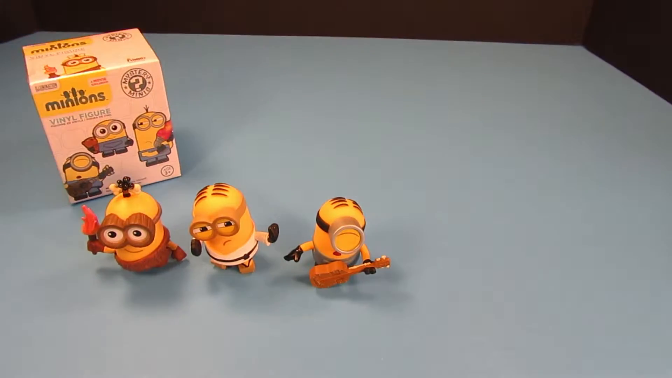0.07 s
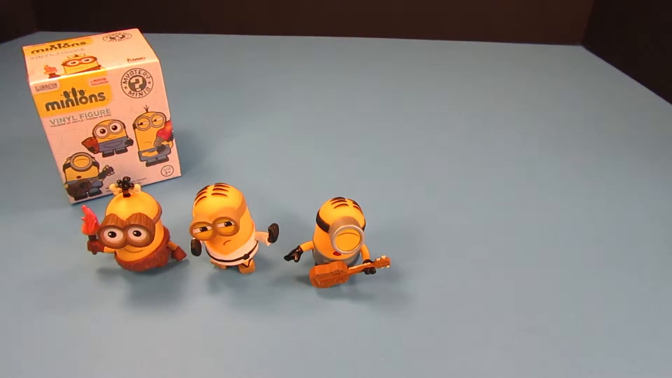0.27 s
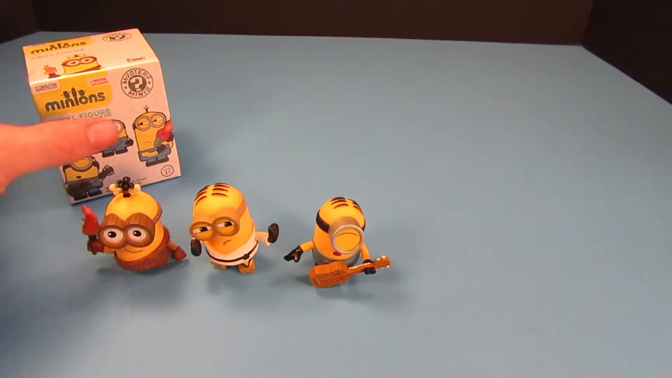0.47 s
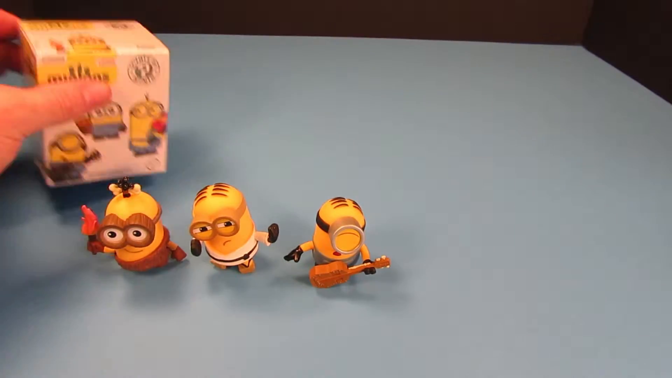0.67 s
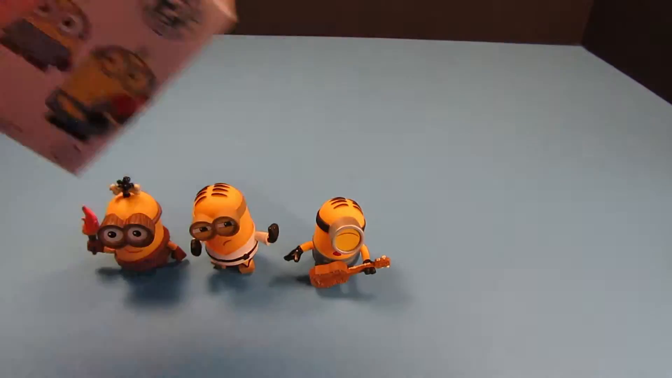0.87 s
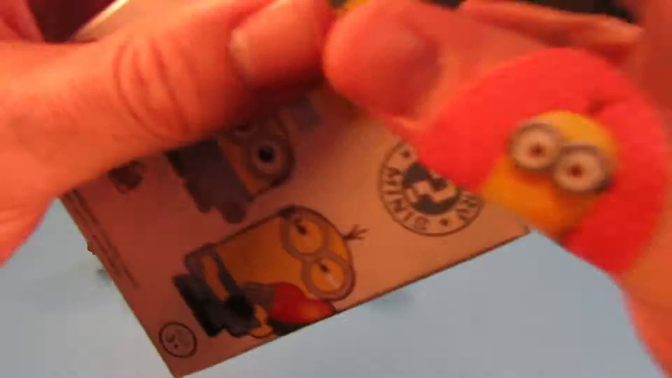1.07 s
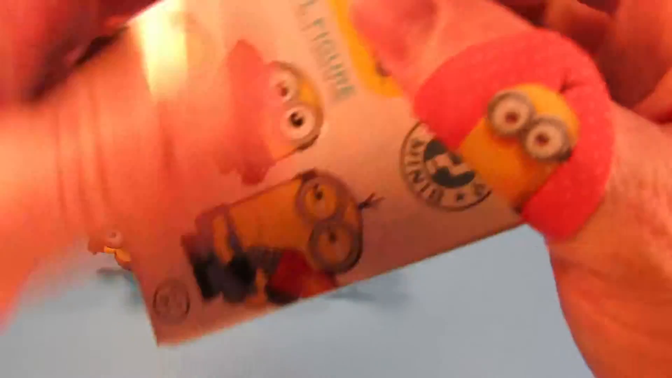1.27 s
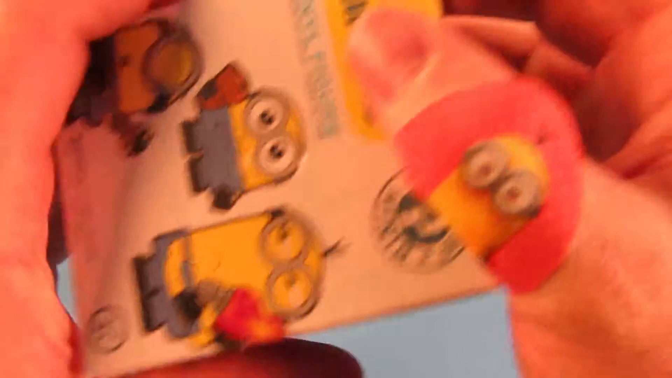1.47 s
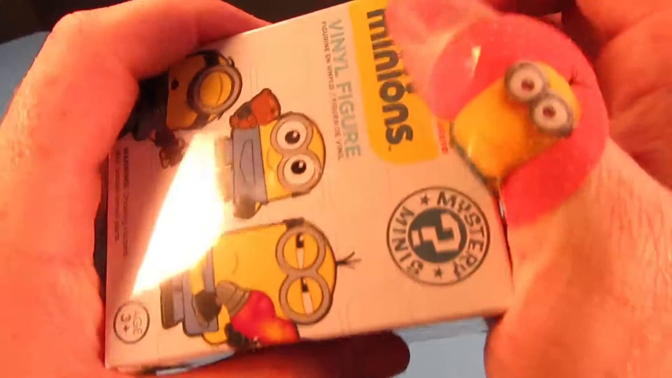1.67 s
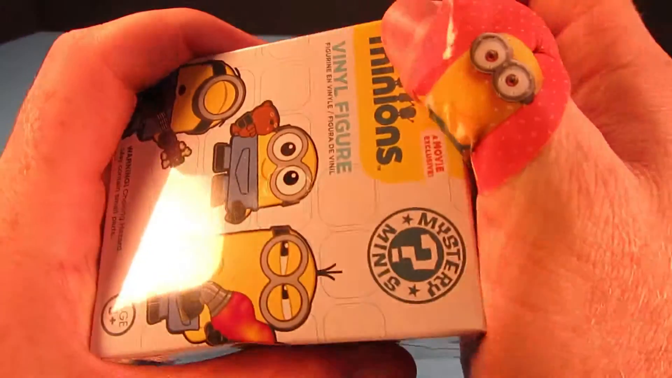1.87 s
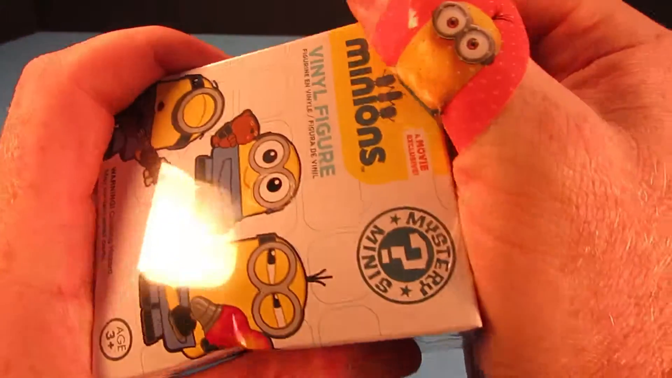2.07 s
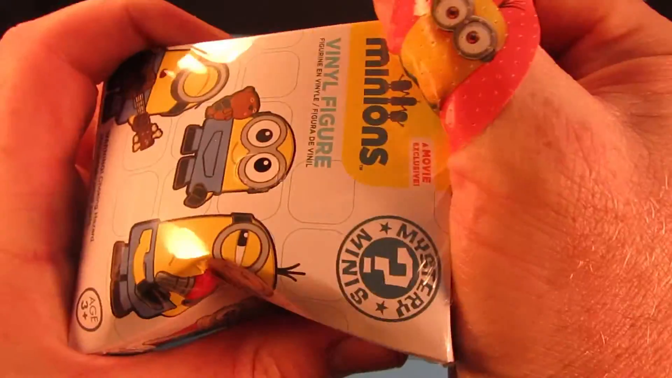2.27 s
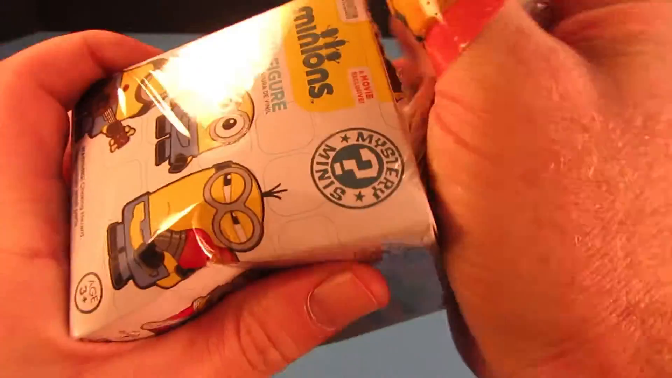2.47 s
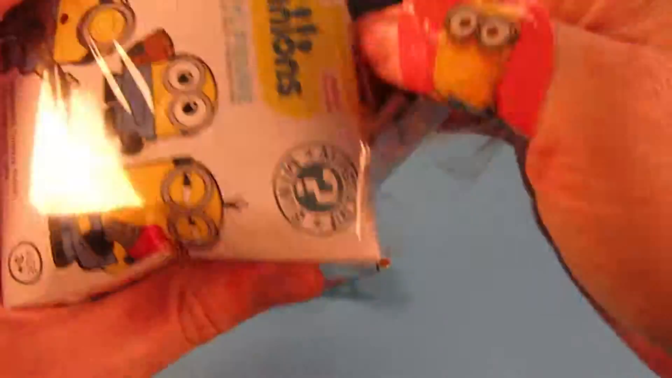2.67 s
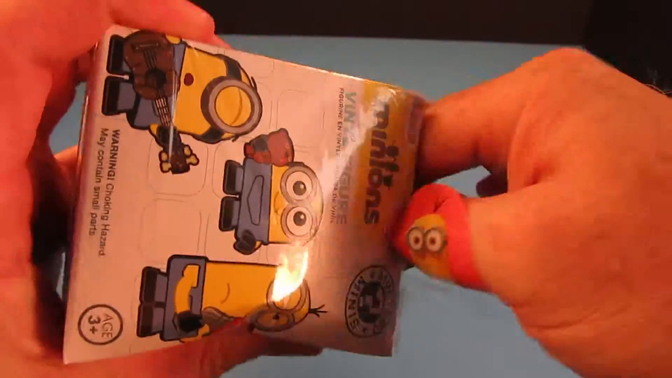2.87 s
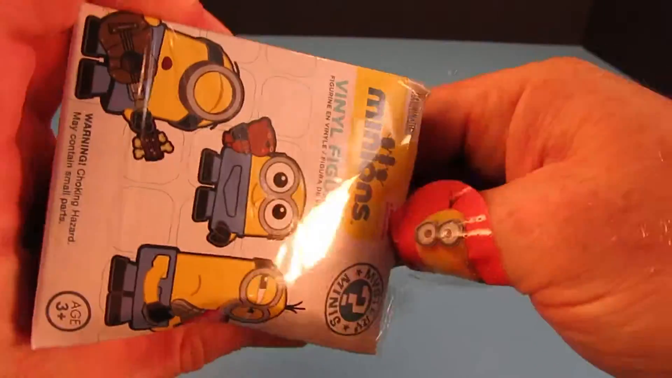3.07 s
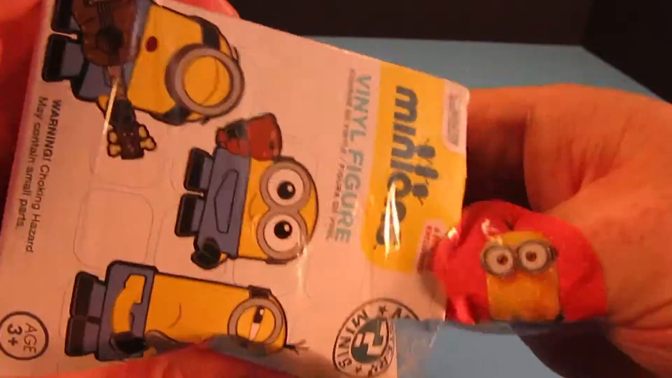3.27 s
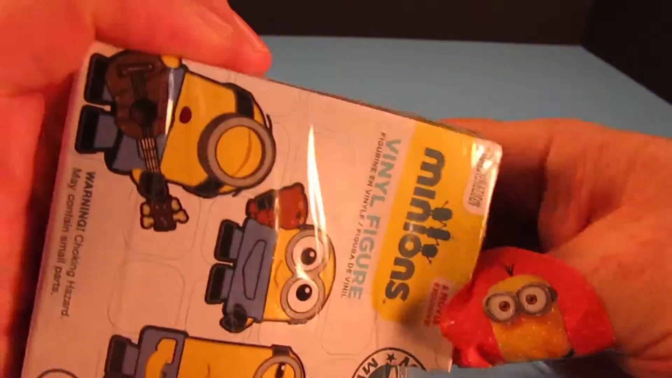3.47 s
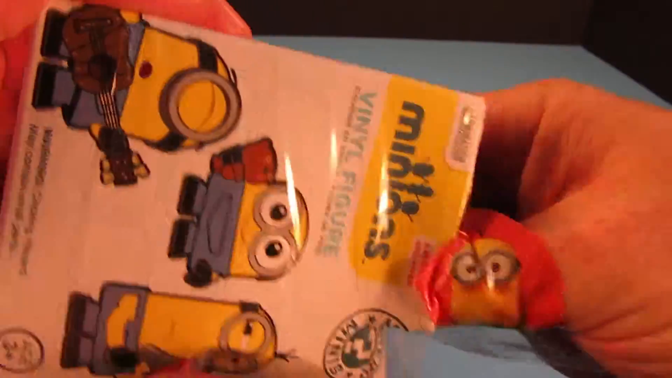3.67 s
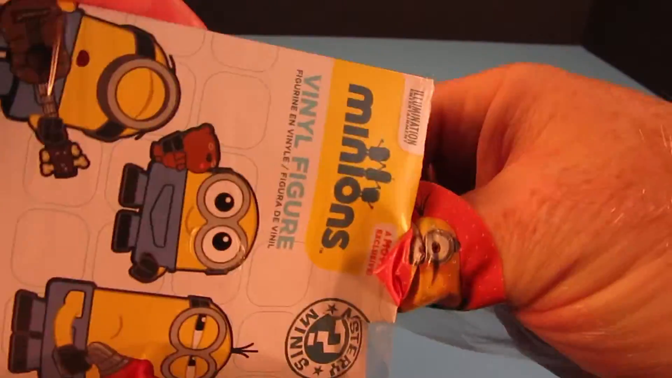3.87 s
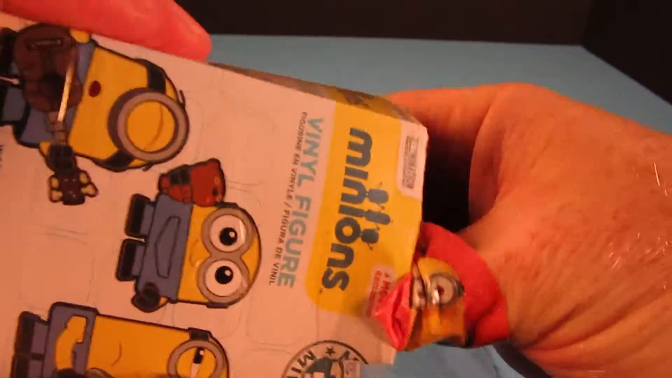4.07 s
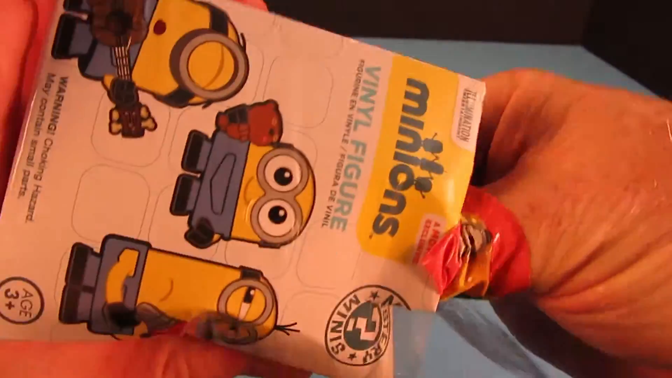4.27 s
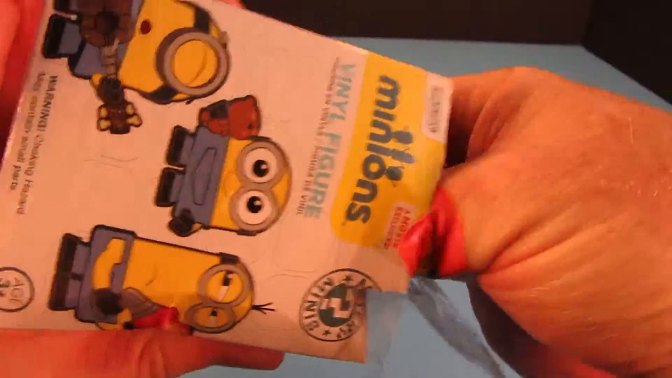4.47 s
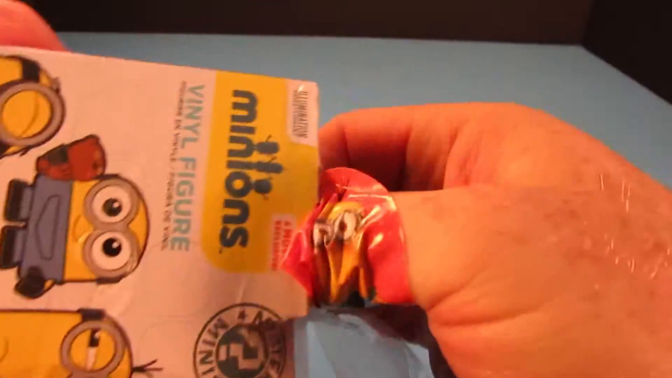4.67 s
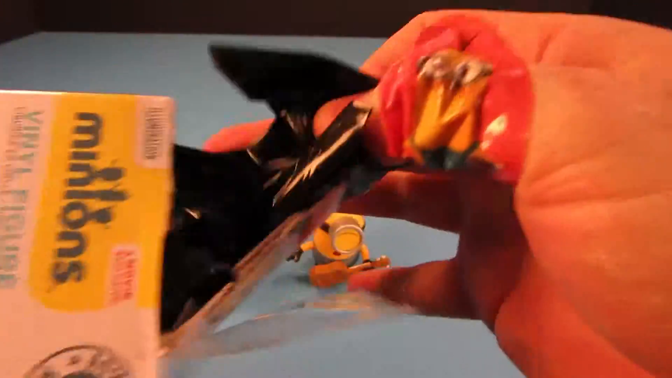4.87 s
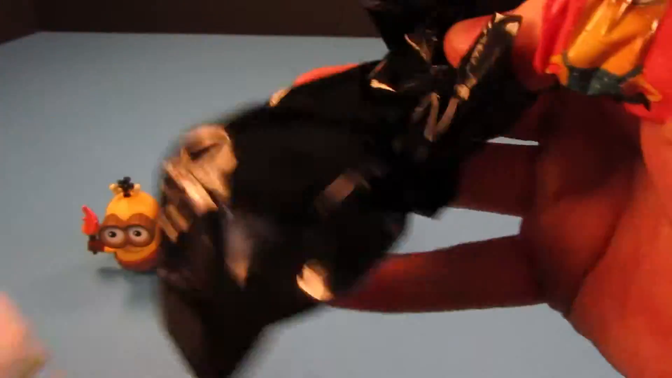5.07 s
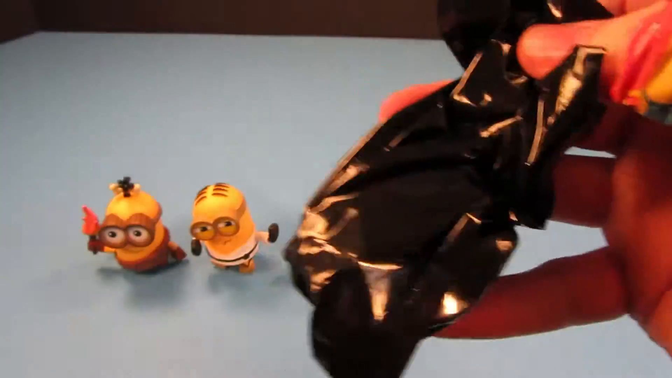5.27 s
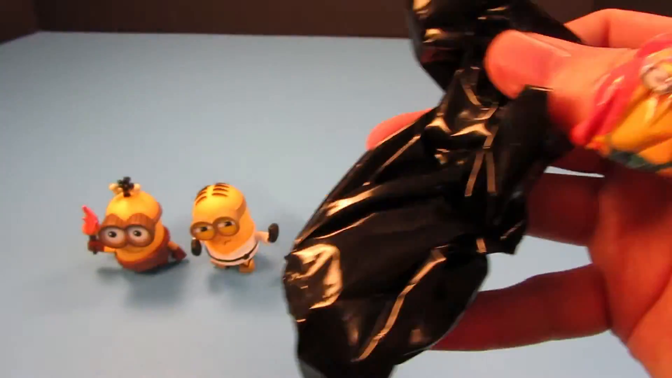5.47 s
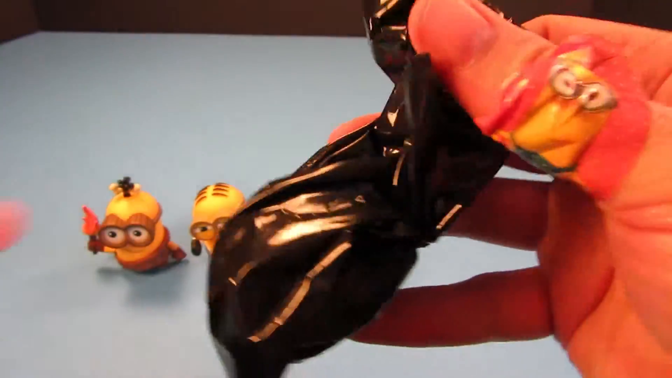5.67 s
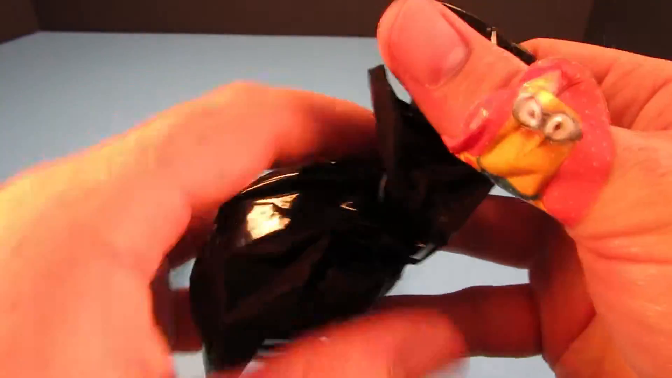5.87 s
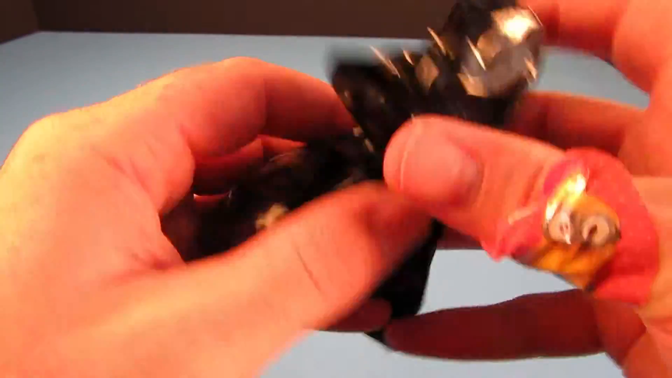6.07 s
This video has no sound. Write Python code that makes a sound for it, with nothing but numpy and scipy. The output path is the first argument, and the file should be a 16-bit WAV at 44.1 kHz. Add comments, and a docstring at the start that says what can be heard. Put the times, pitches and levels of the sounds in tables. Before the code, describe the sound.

A small cardboard box is picked up and worked open by hand, with dry rubbing, hollow finger taps and a flap that clacks loose. Scrapes and crisp snaps continue and thicken into crackling as a foil bag is pulled out. The handling briefly quietens, the empty box lands on the table, and the foil crinkles once more. The microphone is close, in a small, quiet room.

```python
"""A small quiet room, close to a table: hands lift a cardboard box, pry it open and drag out a foil bag.
Card and foil rub in dense stick-slip grains; fingers knock panels and cavity into short hollow rings.
A stiff flap clacks free and judders. Creases buckle with sharp snaps.
The empty box is put down and the bag crackles on in the fingers."""
import sys
import numpy as np
from scipy import signal
from scipy.fft import rfft, irfft
from scipy.io import wavfile
from scipy.ndimage import uniform_filter1d

SR = 44100
rng = np.random.default_rng(int(sys.argv[2]) if len(sys.argv) > 2 else 0)


def log_audio(samples):
    """Write samples as a 16-bit WAV file to the path given in sys.argv[1]."""
    # one column per channel
    frames = np.atleast_2d(samples).T
    # limit to full scale, then quantise
    limited = np.clip(frames, -1, 1)
    pcm = np.round(limited * 32767).astype(np.int16)
    wavfile.write(sys.argv[1], SR, pcm)


N = 269892

# room tone spectrum: f/Hz, level/dB
ROOM_SPECTRUM = [(20, -21), (35, -8.5), (120, -11), (300, -9), (560, -13), (740, -8.5), (1480, -21),
                 (8800, -27.5), (9640, -24.5), (11000, -32.5), (15000, -38.5)]
# room tone envelope: t/s, level/dB
ROOM_ENVELOPE = [(0, -55.5), (1.4, -52), (2.6, -57), (6.12, -60.5)]
# surface hiss spectrum: f/Hz, level/dB
HISS_SPECTRUM = [(300, -37.5), (600, -26), (1200, -4), (2300, -0.5), (4500, -4.5), (7000, -5),
                 (10000, -8.5), (13000, -14), (15000, -16.5)]
# box body spectrum: f/Hz, level/dB
BODY_SPECTRUM = [(50, -29), (120, -13.5), (230, -5), (450, -0.5), (590, -1), (770, 2.5), (940, -9),
                 (1250, -7.5), (2200, -16), (5000, -70.5)]
# light hand contact between strokes: t/s, hiss/dB, body re hiss/dB
HAND_CONTACT = [(0.62, -61.5, 8), (0.95, -55.5, 6), (1.25, -50, 2.5), (1.39, -74, 11), (1.6, -51, 2),
                (1.8, -53.5, 4), (2.35, -48, -3.5), (2.77, -58.5, 1.5), (3.0, -50.5, -1), (3.4, -48.5, -1),
                (3.95, -52.5, -2), (4.4, -49.5, -7), (4.95, -45.5, -7), (5.15, -52, 0), (5.28, -62.5, -1),
                (5.72, -64.5, -6), (5.92, -51, 1.5), (6.12, -47, -1.5)]
# strokes of fingers, card and foil: start/s, length/s, hiss/dB
RUB_STROKES = [(0.911, 0.038, -48), (0.991, 0.086, -44.5), (1.26, .055, -47), (1.467, 0.032, -42.5),
               (1.556, 0.064, -46.5), (1.638, 0.054, -32), (1.883, 0.062, -35), (1.983, 0.074, -38),
               (2.213, 0.049, -32), (2.571, 0.022, -41), (2.663, 0.036, -35), (2.811, 0.039, -46.5),
               (2.888, 0.064, -36.5), (2.975, 0.053, -37.5), (3.095, 0.033, -41), (3.215, .065, -40),
               (3.283, 0.056, -28.5), (3.424, 0.078, -43), (3.672, 0.015, -42.5), (3.765, 0.094, -44),
               (3.948, 0.028, -41), (4.043, 0.081, -42), (4.147, 0.035, -40.5), (4.217, .12, -40.5),
               (4.42, 0.064, -35), (4.554, 0.15, -39), (4.738, 0.03, -39.5), (4.799, 0.28, -31.5)]
# quick slides of card: peak/s, rise/s, fall/s, hiss/dB, body/dB
CARD_SLIDES = [(1.05, 0.0065, .015, -45, -31), (1.678, .005, 0.013, -39, -36),
               (2.252, .002, 0.0059, -13, -43), (2.4, 0.0065, .005, -13.5, -23),
               (2.41, .002, 0.0036, -7, -29.5), (2.427, .0057, 0.017, -15.5, -18),
               (3.312, .008, .005, -15.5, -27), (3.327, .002, 0.007, -14, -15)]
# empty box landing, edge then face: t/s, hiss/dB, body/dB
BOX_LANDINGS = [(5.744, -35, -25.5), (5.759, -25.5, -18.5)]
# table modes: f/Hz, level/dB, 60 dB decay/cycles
TABLE_MODES = [(111, -0.5, 18), (168, -0.5, 17), (290, -6.5, 33), (344, -7, 32.5), (617, 2.5, 38.5),
               (720, 1, 23), (1430, -38, 36)]
# dull bumps on the table: t/s, level/dB
TABLE_BUMPS = [(0.7062, -24), (0.7926, -41), (0.917, -36)]
# card panel modes: frequency ratio, level/dB, 60 dB decay/cycles
PANEL_MODES = [(1, -3.5, 20), (1.17, 2.5, 6), (1.55, -11.5, 15), (2.3, -15, 15.5)]
# air and wall modes of the whole box: frequency ratio, level/dB, 60 dB decay/cycles
CAVITY_MODES = [(1, 4.5, 7.5), (.7, -9.5, 7), (1.35, -16, 15.5)]
# fingers, flaps and contents hitting the box: t/s, panel/dB, cavity/dB, cavity f/Hz
BOX_KNOCKS = [(0.801, -31, -39, 210), (1.032, -11, -12.5, 473), (1.1826, -25.5, -53, 447),
              (1.2285, -26, -46, 370), (1.4994, -25.5, -33, 476), (1.6689, -27, -16.5, 223),
              (1.682, -26.5, -24, 263), (1.9172, -25.5, -23.5, 330), (2.071, -12.5, -25, 453),
              (2.2111, -23.5, -25, 450), (2.2503, -18, -24.5, 350), (2.4122, -21, -15.5, 360),
              (2.4226, -19, -24, 198), (2.9884, -27, -25.5, 480), (3.2883, -10.5, -24, 500),
              (3.3244, -15, -28, 493), (3.3662, -19, -20, 404), (3.5185, -6, -9.5, 371),
              (3.579, -35, -27, 406), (3.7561, -26.5, -39.5, 420), (3.8232, -39, -26, 353),
              (3.953, -27.5, -22.5, 435), (4.1643, -24.5, -23.5, 290), (4.2741, -14, -14.5, 324),
              (4.2935, -26, -29.5, 400), (4.815, -17.5, -11.5, 354), (4.856, -24.5, -27, 251),
              (5.0489, -13, -40, 440), (5.082, -25.5, -45, 437), (5.7558, -14.5, -25, 390)]
# filter on all creases: f/Hz, gain/dB
CREASE_SPECTRUM = [(80, -32.5), (300, 4), (750, 10), (1300, 2.5), (2900, -1), (7000, -2.5), (11000, -2),
                   (15000, -10.5)]
# fingers crumpling the foil: start/s, length/s, typical crease/dB
FOIL_SQUEEZES = [(4.427, .3, -32.5), (4.822, .26, -23), (5.1, .12, -29), (5.28, .35, -51.5),
                 (5.921, .045, -24), (6.001, .11, -31)]
# single creases of foil and card: t/s, level/dB, centre f/Hz
CREASE_SNAPS = [(0.708, -27, 1890), (0.967, -32, 2400), (1.0307, -12, 3600), (1.078, -25, 2600),
                (1.2169, -28.5, 1550), (1.2948, -9.5, 7800), (1.677, -19, 1900), (1.9175, -18, 2620),
                (1.935, -20, 5950), (2.072, -12.5, 3000), (2.2104, -15, 2220), (2.251, -5, 5630),
                (2.3012, -25.5, 1390), (2.3994, -6, 7900), (2.4116, -5.5, 5470), (2.6196, -28.5, 1810),
                (2.9068, -17.5, 2970), (3.0451, -16, 5500), (3.3243, -7.5, 4200), (3.432, -22.5, 2460),
                (3.4442, -18.5, 3020), (3.5194, -16.5, 1700), (3.5668, -25, 3430), (3.7569, -20.5, 2320),
                (3.9537, -20, 2620), (4.0627, -13, 3730), (4.1629, -21.5, 3470), (4.428, -22.5, 2400),
                (4.442, -21, 2750), (4.8156, -6.5, 3700), (4.9892, -18.5, 4140), (5.0491, -9, 3480),
                (5.2955, -33.5, 3900), (5.3103, -20, 3780), (5.3876, -28, 4740), (5.5299, -35, 3060),
                (5.856, -27, 5000), (5.9091, -24, 2900), (5.9493, -19, 5100), (6.0585, -24.5, 3020),
                (6.0873, -14.5, 6330), (6.1103, -13.5, 5000)]

JUDDER_TIMES_S = 2.0868 + .0134 * np.arange(4)  # catches of the freed flap


def undb(db):
    """Decibels to gain."""
    return 10 ** (np.asarray(db) / 20)


def unit(x):
    """Scale to unit rms."""
    return x / np.sqrt(np.mean(x ** 2))


def unit_peak(x, size):
    """Scale the loudest window of size samples to unit rms."""
    return x / np.sqrt(uniform_filter1d(x ** 2, size, mode="constant").max())


def curve(rows):
    """Interpolate each column linearly over time."""
    times_s, *columns = np.transpose(rows)
    return [np.interp(np.arange(N) / SR, times_s, column) for column in columns]


def swell(t, rise_s, hold_s, fall_s):
    """Exponential rise to one at t = 0, hold, exponential fall."""
    return np.exp(-np.clip(np.maximum(-t / rise_s, (t - hold_s) / fall_s), 0, 20))


def wander(size):
    """Random drift, correlated over size samples."""
    return np.clip(unit(uniform_filter1d(rng.standard_normal(N), size)), -2, 2)


def add(track, at_s, sound):
    """Mix sound into track."""
    i = max(int(at_s * SR), 0)
    track[i:i + len(sound)] += sound[:max(N - i, 0)]


def colour(x, spectrum, size=2048):
    """Minimum-phase filter from rows of f/Hz, gain/dB."""
    hz, db = np.transpose(spectrum)
    bins_hz = np.maximum(np.fft.rfftfreq(size, 1 / SR), 1)
    gain = undb(np.interp(np.log(bins_hz), np.log(hz), db))
    cepstrum = irfft(np.log(gain))
    cepstrum[1:size // 2] *= 2
    cepstrum[size // 2 + 1:] = 0
    return signal.fftconvolve(x, irfft(np.exp(rfft(cepstrum))))[:len(x)]


def resonance(x, hz, q):
    """Two-pole band-pass, unity gain at centre."""
    w = 2 * np.pi * min(hz, SR / 3) / SR
    a = np.sin(w) / (2 * q)
    return signal.lfilter([a, 0, -a], [1 + a, -2 * np.cos(w), 1 - a], x)


def ring(modes, pitch_hz=1, detune=.067, contact_s=.00031, size=4096):
    """Struck modes, detuned by the grip; soft contact rounds the attack."""
    t = np.arange(size) / SR
    ratio, db, cycles = np.transpose(modes)[:, :, None]
    hz = ratio * pitch_hz * (1 + detune * rng.standard_normal(ratio.shape))
    partials = undb(db) * np.cos(2 * np.pi * hz * t) * np.exp(-np.log(1000) * t * hz / cycles)
    return unit_peak(partials.sum(0) * (1 - np.exp(-t / contact_s)), size=110)


def room_tone():
    """Faint low noise, level drifting slowly."""
    return undb(curve(ROOM_ENVELOPE)[0]) * unit(colour(rng.standard_normal(N), ROOM_SPECTRUM))


def reflections(x, wet_db=-17, t60_s=.12, first_s=.00529, cutoff_hz=4000, size=16384):
    """Table and near walls add a short, duller tail."""
    t = np.arange(size) / SR
    tail = rng.standard_normal(size) * np.exp(-np.log(1000) * t / t60_s) * (t > first_s)
    tail = signal.sosfilt(signal.butter(1, cutoff_hz, fs=SR, output="sos"), tail / np.linalg.norm(tail))
    return x + undb(wet_db) * signal.fftconvolve(x, tail)[:N]


def rubbing_db(attack_s=.005, release_s=.0096, swell_db=1.5, hop=32):
    """Hiss level: light contact plus strokes that press harder toward their end."""
    t = np.arange(N) / SR
    coarse_s = t[::hop]
    power = undb(curve(HAND_CONTACT)[0][::hop]) ** 2
    for start_s, length_s, db in RUB_STROKES:
        age_s = coarse_s - start_s
        pressure_db = swell_db * (np.clip(age_s / length_s, 0, 1) - .5)
        power += (undb(db + pressure_db) * swell(age_s, attack_s, length_s, release_s)) ** 2
    return np.interp(t, coarse_s, 10 * np.log10(power))


def stick_slip(slips_per_s=2600, scatter_db=4, catch_db=3.5, noise_gain=.47):
    """Tiny slips over smooth noise, bunched by catching and letting go."""
    sizes = undb(scatter_db * np.clip(rng.standard_normal(N), -2, 2)) * np.sign(rng.standard_normal(N))
    impulses = unit(sizes * (rng.random(N) < slips_per_s / SR))
    return (impulses + noise_gain * rng.standard_normal(N)) * undb(catch_db * wander(size=180))


def flex(x, depth_db=4.5, q=6):
    """Sheet resonances come and go as it bends."""
    return sum(resonance(x, hz, q) / hz ** .25 * undb(depth_db * wander(size=900))
               for hz in np.geomspace(900, 14000, 14))


def rim_drag(slips, hiss_db, start_s=4.05, length_s=1.07, fade_s=.048, re_hiss_db=-6.5, hz=689, q=4.7):
    """The bag drags over the open rim; a panel sings."""
    gate = swell(np.arange(N) / SR - start_s, fade_s, length_s, fade_s)
    return undb(hiss_db + re_hiss_db) * gate * unit(resonance(resonance(slips, hz, q), hz, q))


def friction(hiss_db, landing_rise_s=.0009, landing_fall_s=.026):
    """Slips drive surface hiss, box body and rim; slides and landings add bursts."""
    t = np.arange(N) / SR
    hiss_gain = undb(hiss_db)
    body_gain = undb(hiss_db + curve(HAND_CONTACT)[1])
    landings = [(at_s, landing_rise_s, landing_fall_s, *levels_db) for at_s, *levels_db in BOX_LANDINGS]
    for at_s, rise_s, fall_s, surface_db, body_db in CARD_SLIDES + landings:
        burst = swell(t - at_s, rise_s, 0, fall_s)
        hiss_gain = np.hypot(hiss_gain, undb(surface_db) * burst)
        body_gain = np.hypot(body_gain, undb(body_db) * burst)
    slips = stick_slip()
    hiss = hiss_gain * unit(colour(flex(slips), HISS_SPECTRUM))
    body = body_gain * unit(colour(slips, BODY_SPECTRUM))
    return hiss + body + rim_drag(slips, hiss_db)


def table_bumps():
    """Bumps ring the table modes."""
    out = np.zeros(N)
    for at_s, db in TABLE_BUMPS:
        add(out, at_s, undb(db) * ring(TABLE_MODES, size=12000))
    return out


def box_knocks(ref_hz=747, ref_db=-21, octaves_per_db=.009, rattle_db=-19, settle_s=.009, size=4096):
    """Knocks and flap catches ring panel and cavity and rattle the loose flaps."""
    out = np.zeros(N)
    settle = np.exp(-np.arange(size) / SR / settle_s)
    catches = [(at_s, -21, -28, 464) for at_s in JUDDER_TIMES_S]  # columns as BOX_KNOCKS
    for at_s, panel_db, cavity_db, cavity_hz in BOX_KNOCKS + catches:
        panel_hz = ref_hz * 2 ** (octaves_per_db * (panel_db - ref_db))  # harder knock, tighter panel
        rattle = undb(rattle_db) * unit(colour(rng.standard_normal(size), BODY_SPECTRUM)) * settle
        add(out, at_s, undb(panel_db) * (ring(PANEL_MODES, panel_hz, contact_s=.0007) + rattle))
        # enclosed air: slower, opposite in sign
        add(out, at_s, -undb(cavity_db) * ring(CAVITY_MODES, cavity_hz, contact_s=.003))
    return out


def flap(clack_s=2.0716, clack_db=-6.5, catch_db=-24.5, hz=2880):
    """The thumb breaks the stiff flap free; each catch rings it again."""
    out = np.zeros(N)
    catches = [(at_s, catch_db) for at_s in JUDDER_TIMES_S]
    for at_s, db in [(clack_s, clack_db)] + catches:
        add(out, at_s, undb(db) * ring(PANEL_MODES, hz, detune=.037, contact_s=.00048))
    return out


def crease(hz, flip_cycles=2.63, click=2.7, flutter_s=.0066, flutter_db=-18,
           broadband_db=-15, facet_db=-2, spread_octaves=.47, size=1024):
    """A crease flips, rings its facet and two neighbours, and leaves the sheet fluttering."""
    t = np.arange(size) / SR
    envelope = np.exp(-t * hz / flip_cycles) + undb(flutter_db) * np.exp(-t / flutter_s)
    force = rng.standard_normal(size) * envelope
    force[0] += click
    octaves = np.append(0, spread_octaves * rng.standard_normal(2))
    facets = sum(resonance(force, hz * 2 ** offset, q=8) / (1 + abs(offset)) for offset in octaves)
    crack = resonance(resonance(force, hz, q=.5), hz, q=.5) + undb(broadband_db) * force
    return unit_peak(crack + undb(facet_db) * facets, size=44)


def crackle(hiss_db, re_hiss_db=6, scatter_db=3.5, limit_db=-26, centre_hz=4700, octaves=.7, count=650):
    """Small creases give way at random, densest as the bag is drawn out; level follows the rubbing."""
    out = np.zeros(N)
    times_s = rng.triangular(1.2, 4.9, 6.6, count)
    for at_s, (strength, pitch) in zip(times_s, np.clip(rng.standard_normal((count, 2)), -2, 2)):
        typical_db = hiss_db[min(int(at_s * SR), N - 1)] + re_hiss_db
        db = min(typical_db + scatter_db * strength, limit_db + strength)
        add(out, at_s, undb(db) * crease(centre_hz * 2 ** (octaves * pitch), flip_cycles=4.7, click=1.2))
    return out


def crumples(creases_per_s=65, scatter_db=3.5, centre_hz=4580, octaves=.38):
    """Squeezed foil gives way crease by crease at uneven gaps."""
    out = np.zeros(N)
    for start_s, length_s, db in FOIL_SQUEEZES:
        for slot_s in np.arange(start_s, start_s + length_s, 1 / creases_per_s):
            strength, pitch = np.clip(rng.standard_normal(2), -2, 2)
            tick = undb(db + scatter_db * strength) * crease(centre_hz * 2 ** (octaves * pitch))
            add(out, slot_s + rng.random() / creases_per_s, tick)
    return out


def snaps(catch_db=-26.5, catch_hz=1720):
    """The loudest creases snap over singly; each flap catch ticks."""
    out = np.zeros(N)
    catches = [(at_s, catch_db, catch_hz) for at_s in JUDDER_TIMES_S]
    for at_s, db, hz in CREASE_SNAPS + catches:
        add(out, at_s, undb(db) * crease(hz))
    return out


def scene():
    """Rubbing, knocks and creases over room tone, mono."""
    hiss_db = rubbing_db()
    background = room_tone()
    handling = friction(hiss_db) + box_knocks() + table_bumps() + flap()
    creases = colour(snaps() + crackle(hiss_db) + crumples(), CREASE_SPECTRUM)
    return (background + reflections(handling + creases))[None]


def record(dry, highpass_hz=45, clip_level=.86, lowpass_hz=15000):
    """Microphone: bass cut, overload on the sharpest peaks, steep top cut."""
    thinned = signal.sosfilt(signal.butter(1, highpass_hz, "high", fs=SR, output="sos"), dry)
    clipped = np.clip(thinned, -clip_level, clip_level)
    return signal.sosfilt(signal.ellip(12, .2, 80, lowpass_hz, fs=SR, output="sos"), clipped)


dry = scene()
out = record(dry)
log_audio(out)
```